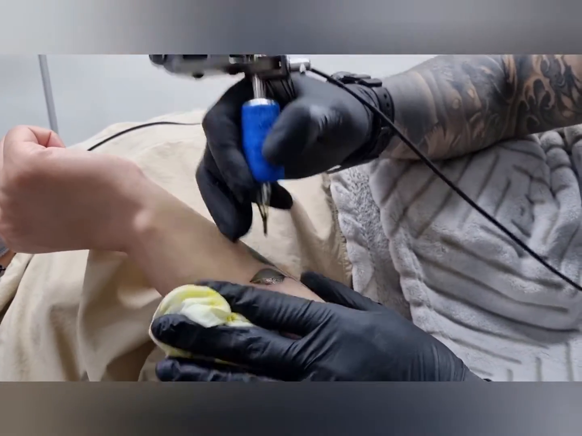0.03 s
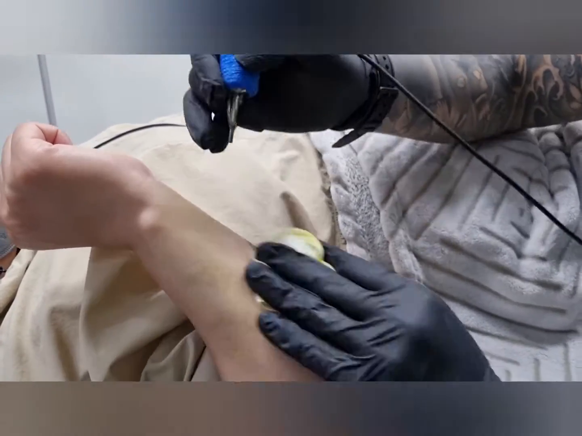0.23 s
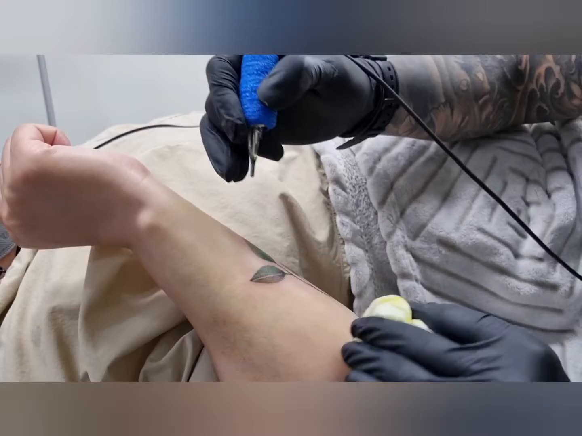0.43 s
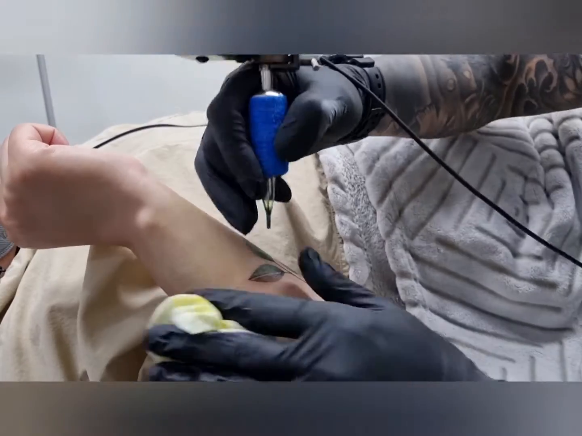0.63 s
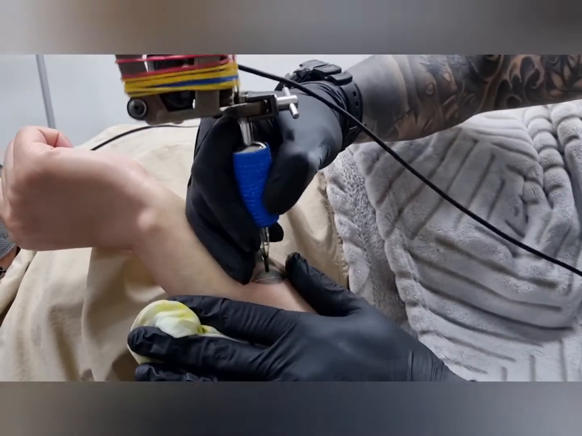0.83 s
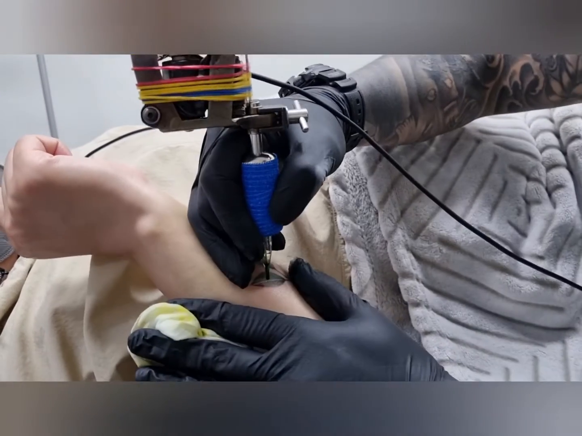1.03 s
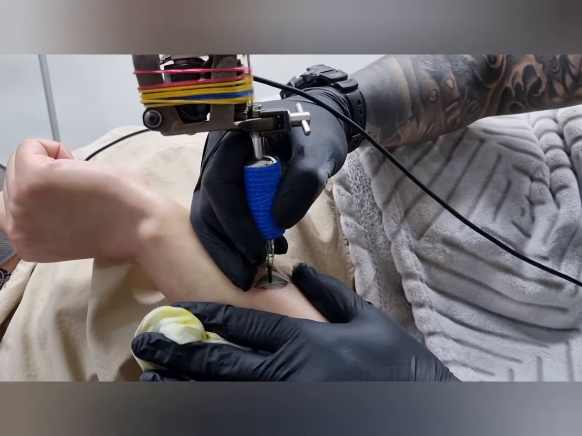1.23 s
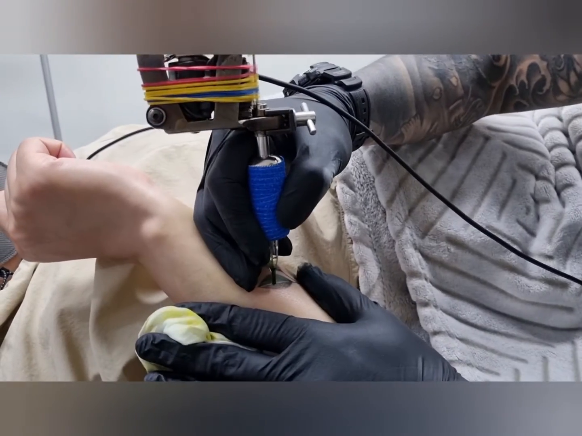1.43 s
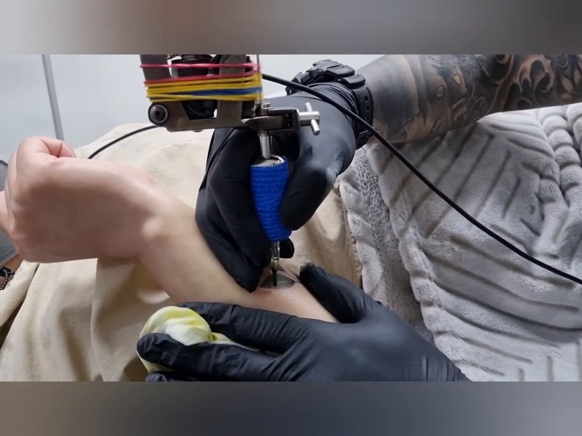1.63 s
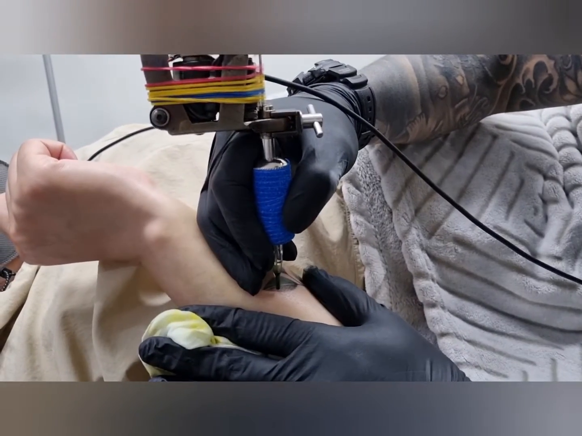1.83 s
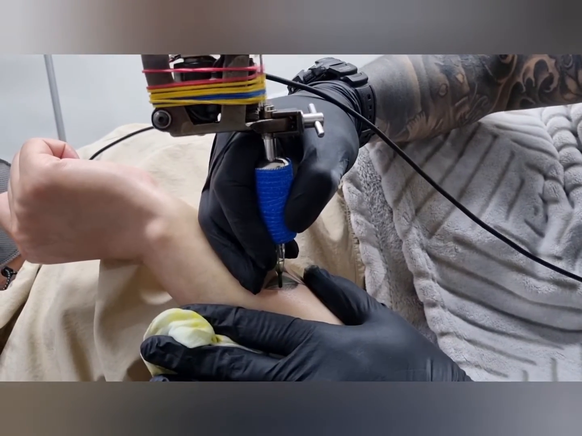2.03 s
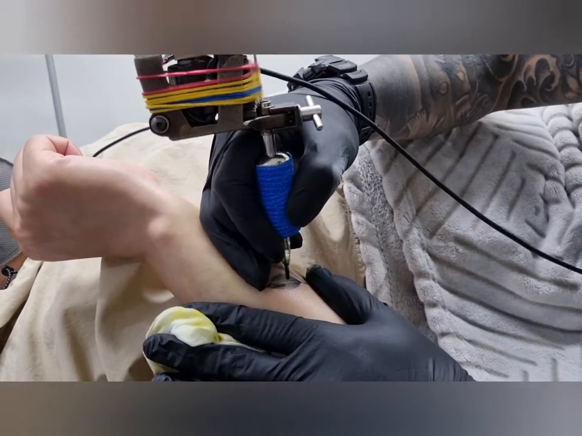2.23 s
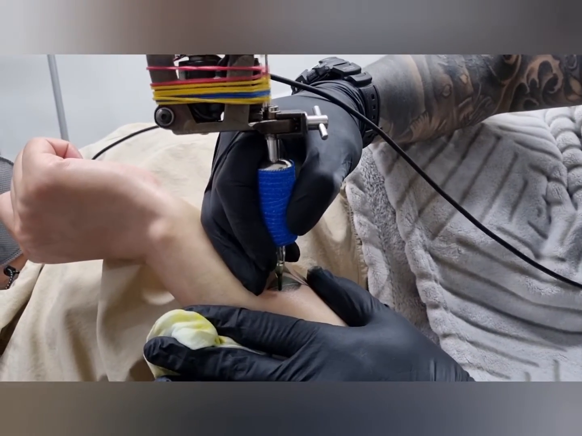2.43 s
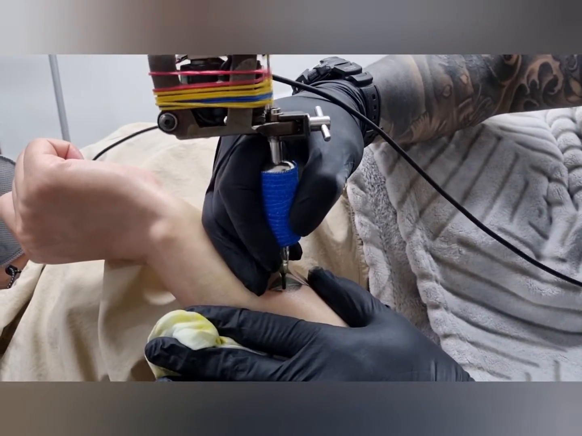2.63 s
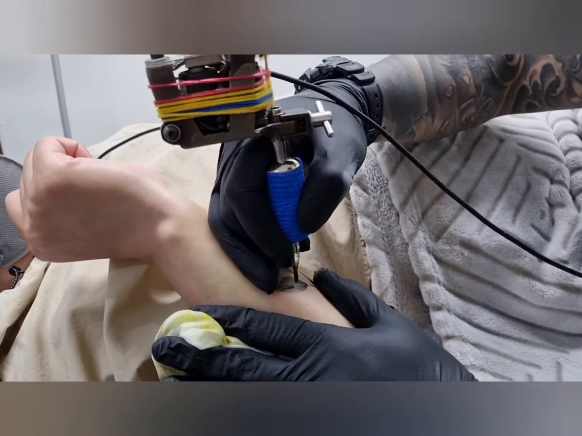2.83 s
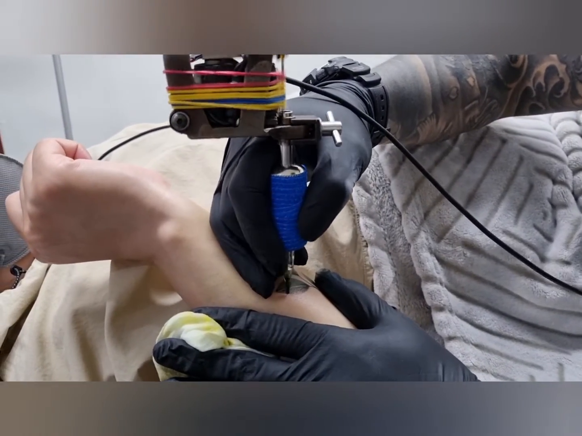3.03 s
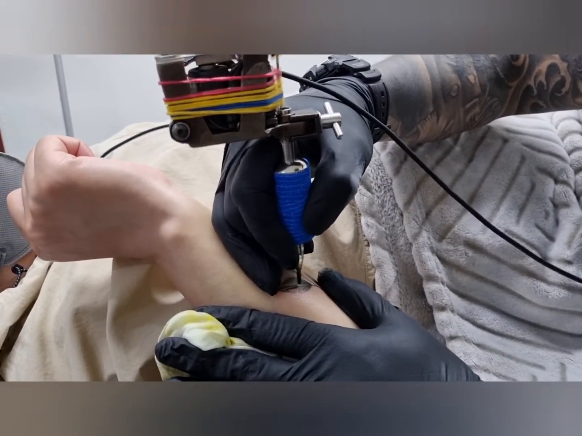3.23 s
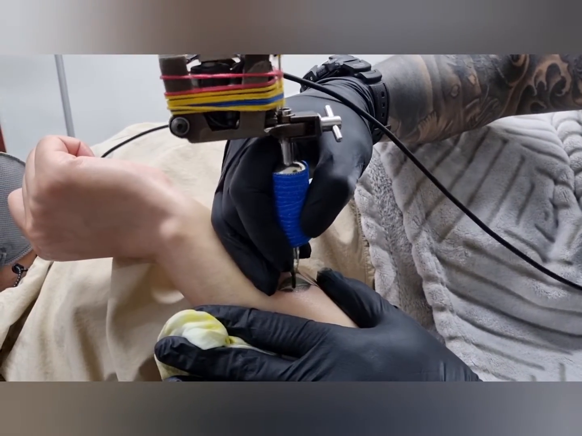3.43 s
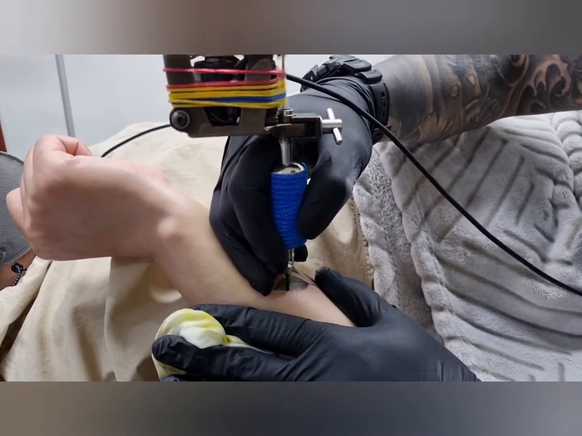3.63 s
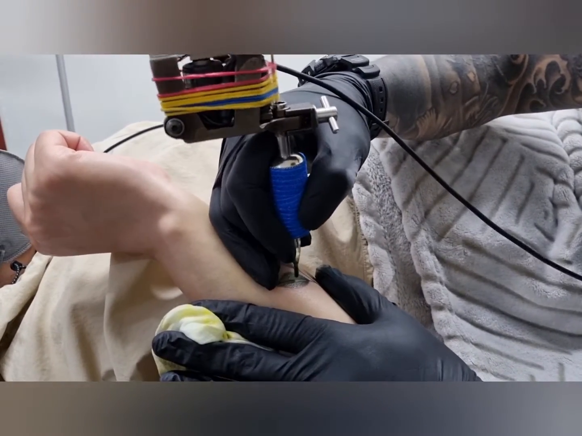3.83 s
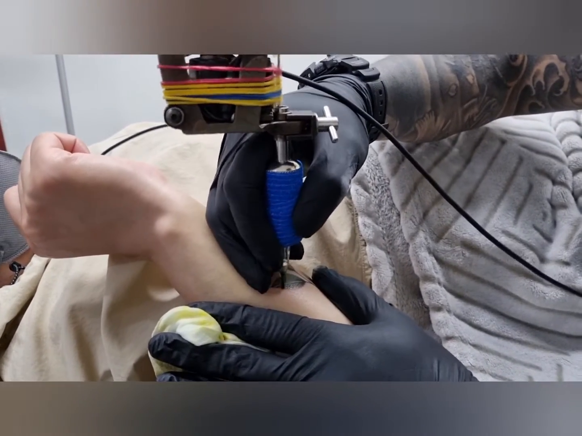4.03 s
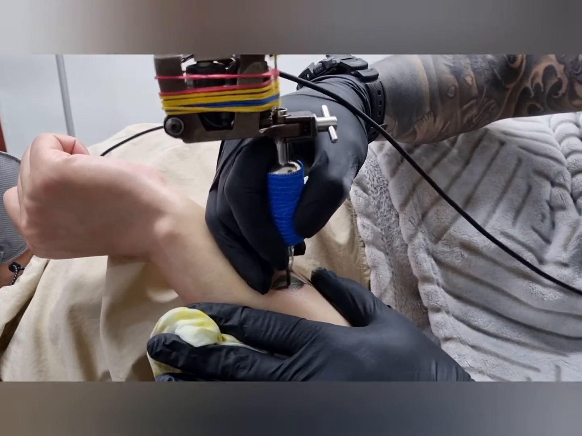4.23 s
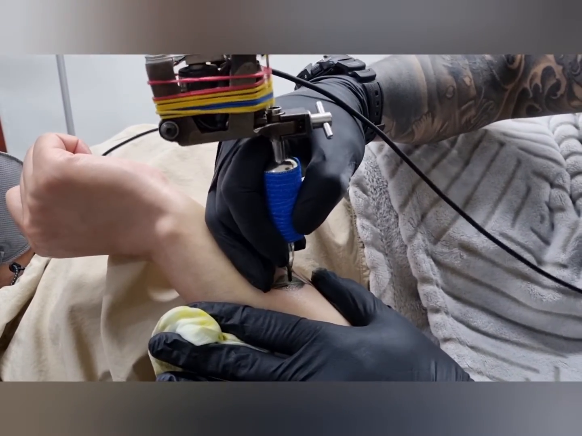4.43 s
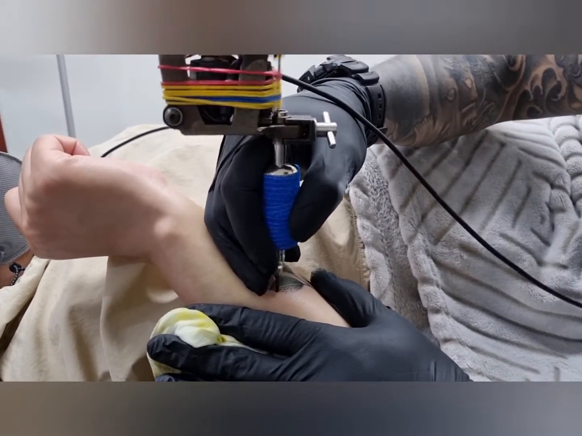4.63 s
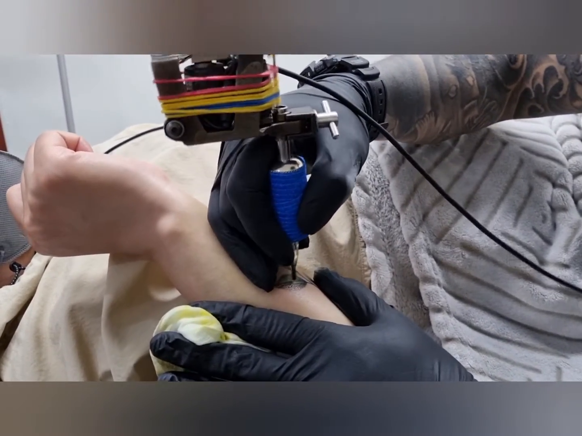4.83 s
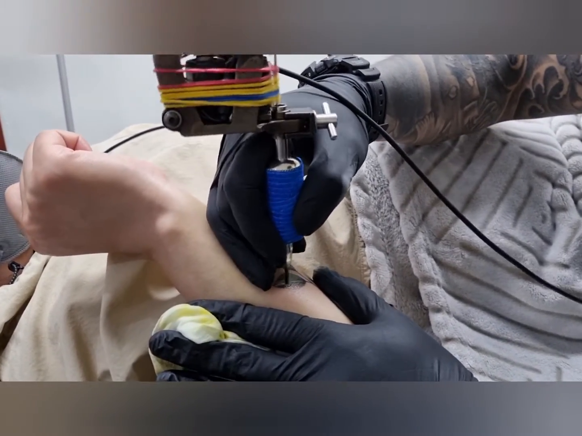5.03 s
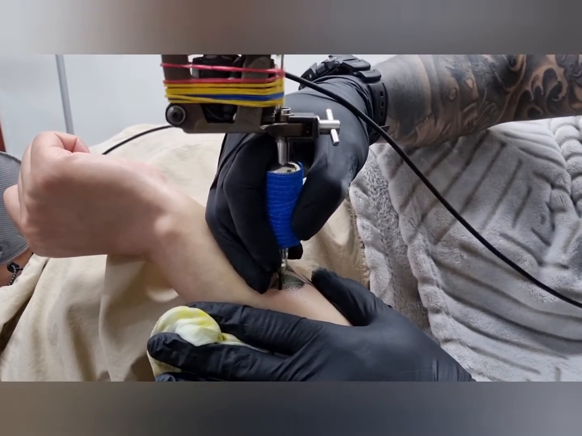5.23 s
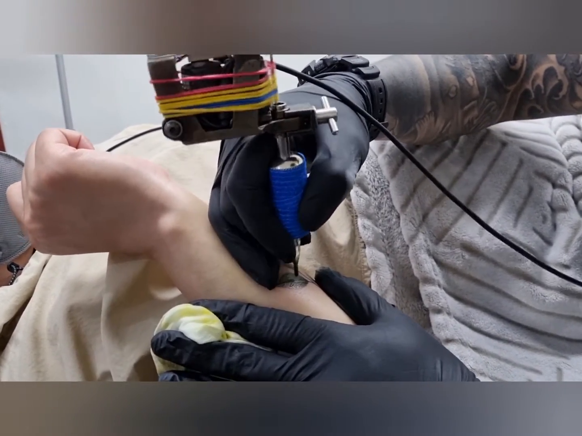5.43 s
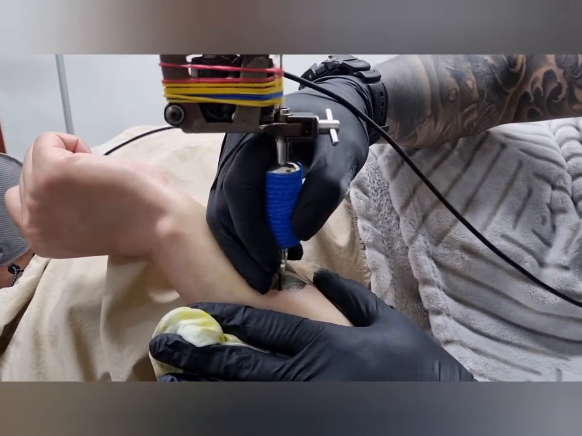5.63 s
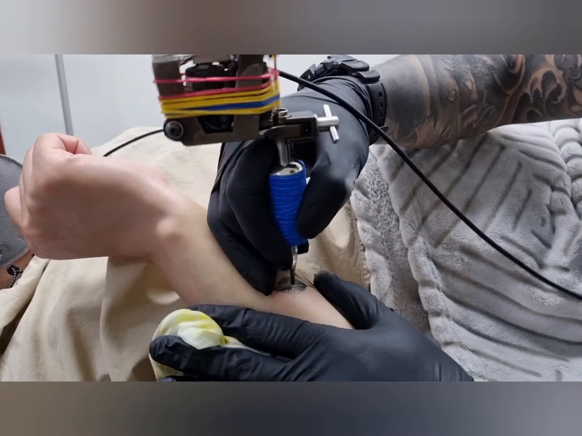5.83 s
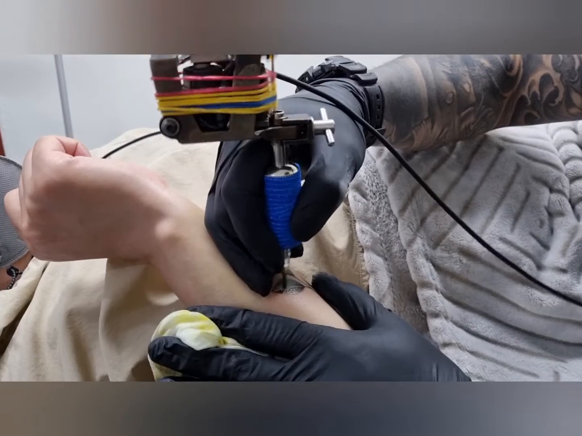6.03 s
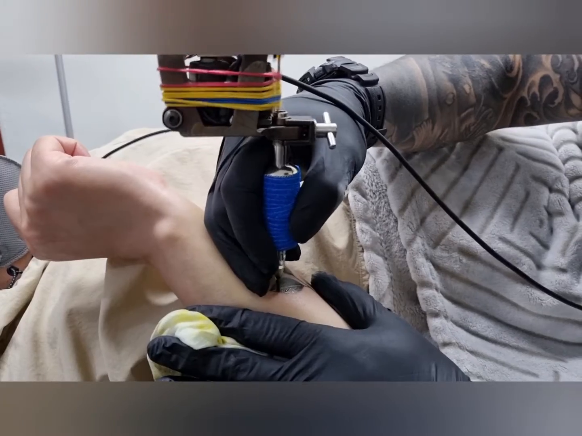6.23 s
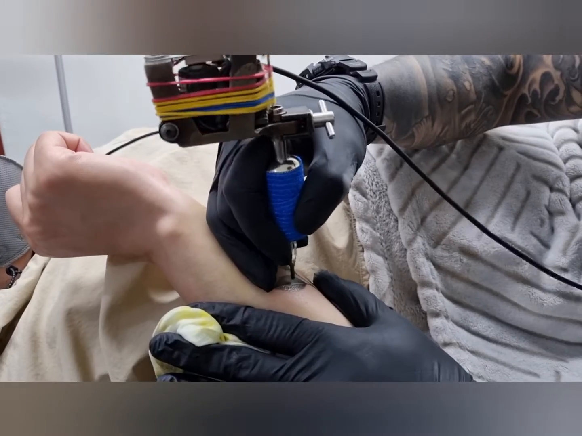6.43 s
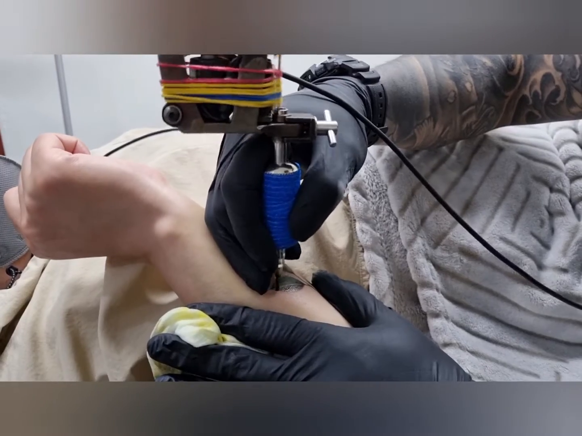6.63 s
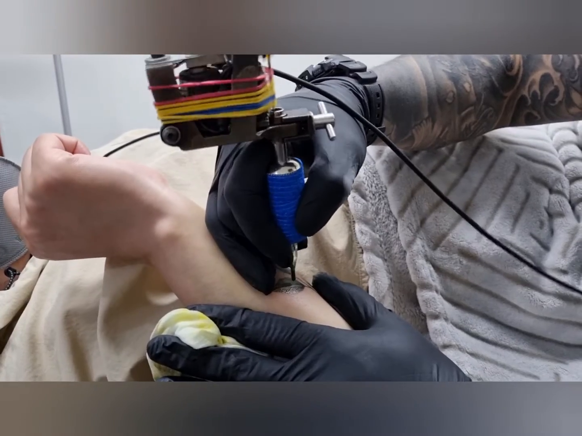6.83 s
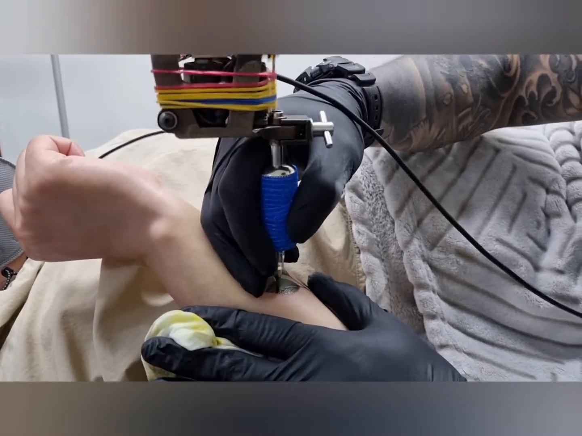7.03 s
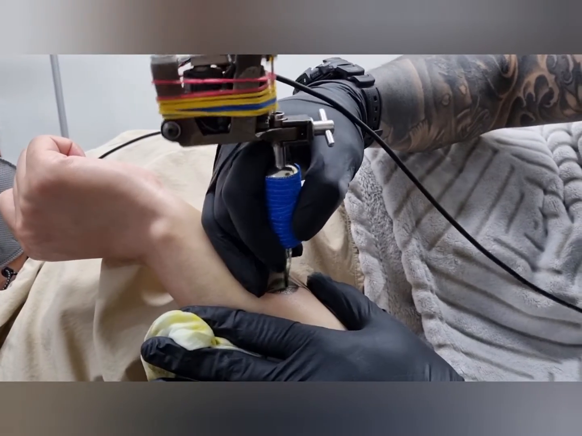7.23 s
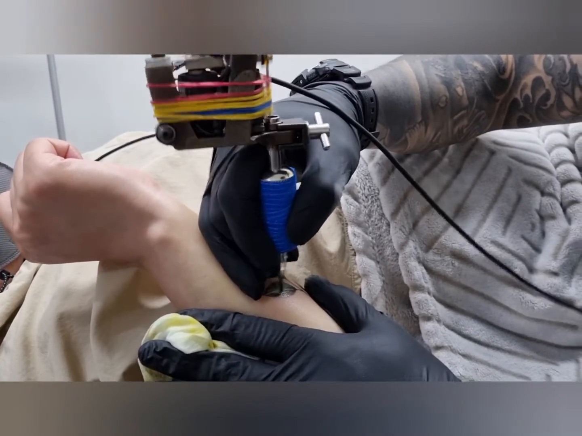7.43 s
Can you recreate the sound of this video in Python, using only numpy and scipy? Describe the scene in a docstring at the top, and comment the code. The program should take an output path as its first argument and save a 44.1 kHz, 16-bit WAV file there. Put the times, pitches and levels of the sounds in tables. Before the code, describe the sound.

In a small studio with a short, close room response, a coil tattoo machine buzzes right by a handheld camera. The first burst lasts under 0.1 s, then power drops with a very short ring. Until about 0.59 s there is near quiet: faint room air, soft grainy strokes of glove and tissue on skin, and light metallic ticks. A click and dull kick restart the machine, briefly looser and more rattly before the needle meets skin at about 0.76 s. It then holds a steady, harsh buzz of roughly 130 strokes a second, low hum beneath a bright, sizzling steel edge. From 2 s the timbre sways about twice a second, more deeply by 4.6 s. From 3.2 s fingers rub and crackle on the camera, with irregular low thumps, strongest around 6.3 to 7.2 s. The buzz continues to the end, about 7.5 s.

```python
"""In a small studio, a coil tattoo machine buzzes close to a handheld camera: about 130 strokes a second.
It stops for half a second while the skin is wiped, then runs on and the needle meets the skin.
From two seconds on its tone swings as the hand shades in growing circles; after three, handling bumps.
Stroke impulses with scattered phase excite steel resonances; a bank of cosines makes the hum.
Shaped noise makes air and wipes; filtered impulses make knocks and bumps. Levels precede later gains."""
import sys
import numpy as np
from scipy import signal
from scipy.fft import rfft, irfft, next_fast_len
from scipy.io import wavfile
from scipy.ndimage import map_coordinates

SR = 44100
rng = np.random.default_rng(int(sys.argv[2]) if len(sys.argv) > 2 else 0)


def materialize(psi):
    """Save the field psi as 16-bit PCM at rate SR to the path in sys.argv[1].

    A 1-D psi becomes a single channel; in a 2-D psi each row is a channel.
    """
    bounded = np.clip(np.atleast_2d(psi).T, -1, 1)
    quanta = np.round(bounded * 32767).astype(np.int16)
    wavfile.write(sys.argv[1], SR, quanta)


N = 330750
# splits a left-minus-right difference evenly over the two ports
HALVES = np.array([[.5], [-.5]])


def amp(db):
    """Decibels to gain."""
    return 10 ** (np.asarray(db) / 20)


def unit(x):
    """Scale to rms 1."""
    return x / np.sqrt(np.mean(x ** 2) + 1e-20)


def seconds():
    """Time of every sample."""
    return np.arange(N) / SR


def along(points, hz):
    """Interpolate (Hz, value) points on a log frequency axis."""
    f, v = np.transpose(points)
    return np.interp(np.log(hz + 1), np.log(f + 1), v)


def curves(rows):
    """One value per sample for each column after the time."""
    s, *cols = np.transpose(rows)
    return [np.interp(seconds(), s, c) for c in cols]


def wobble(rate):
    """Smooth random curve with rate knots a second."""
    knots = rng.standard_normal(int(N * rate / SR) + 4)
    return map_coordinates(knots, [np.arange(N) * rate / SR])


def filtered(x, response):
    """Multiply the spectrum of x by a complex response of frequency."""
    m = 2 * next_fast_len((N + SR) // 2)
    return irfft(rfft(x, m) * response(np.fft.rfftfreq(m, 1 / SR)), m)[..., :N]


def causal(points, hz):
    """Minimum-phase response with the given (Hz, dB) colour."""
    cepstrum = irfft(np.log(amp(along(points, hz))))
    cepstrum[1:len(hz) - 1] *= 2
    cepstrum[len(hz):] = 0
    return np.exp(rfft(cepstrum))


def mode(hz, centre_hz, width_hz):
    """Response of one damped resonance, 1 at its centre."""
    damping = 1j * hz * width_hz
    return damping / (centre_hz ** 2 - hz * hz + damping)


def pulses(times, sizes):
    """Impulses placed between samples by a windowed sinc."""
    at = np.asarray(times)[:, None] * SR
    index = np.floor(at).astype(int) + np.arange(-7, 9)
    taps = np.asarray(sizes)[:, None] * np.sinc(index - at) * np.sinc((index - at) / 8)
    inside = (index >= 0) & (index < N)
    return np.bincount(index[inside], taps[inside], N)


def dispersed(x, spread_s, step_hz):
    """Each frequency leaves the steel at its own moment, differently towards each ear."""
    def response(hz):
        knots = rng.standard_normal((2, 200))
        delay_s = spread_s * np.array([np.interp(hz / step_hz, np.arange(len(k)), k) for k in knots])
        return np.exp(-2j * np.pi * np.cumsum(delay_s, axis=1) * hz[1])
    return filtered(x, response)


def moving_resonance(x, centre_hz, width_hz):
    """Steep-sided resonance whose centre and width follow curves."""
    hz, t, z = signal.stft(x, SR, nperseg=256)
    centre, width = (np.interp(t * SR, np.arange(N), curve) for curve in (centre_hz, width_hz))
    detuning = (2 * (hz[:, None] - centre) / width) ** 2
    shaped = z / np.sqrt(1 + detuning ** 2 + detuning ** 3)
    return signal.istft(shaped, SR, nperseg=256)[1][:, :N]


def at_ports(x, lead):
    """One ring heard at both microphone ports, the left leading by a phase in radians."""
    return np.real(signal.hilbert(x) * np.exp(1j * lead * HALVES))


# Air noise colour. Each row: frequency in Hz, gain in dB.
AIR_COLOUR = [(25, -24), (90, -10), (170, -2), (260, -17), (400, -6), (700, -17), (2000, -23), (4000, -20),
              (8000, -30), (15000, -64.5)]
# Low rumble of the room. Each row: time in seconds, relative level in dB.
RUMBLE_LEVEL = [(0, -71.5), (0.7, -78), (1.3, -64.5), (2.3, -69.5)]


def background():
    """Room air and a low, slowly changing rumble as coloured noise, with a faint 120 Hz mains hum."""
    def noise(colour):
        return unit(filtered(rng.standard_normal((2, N)), lambda hz: amp(along(colour, hz))))
    rumble = noise([(30, -23.0), (80, -10.5), (120, -4.5), (150, -10.5), (200, 0), (340, -7.0),
                    (700, -18.0), (2000, -29)])
    rumble = rumble * amp(curves(RUMBLE_LEVEL)[0] + 1.5)
    mains = amp(-76) * np.sin(2 * np.pi * 120 * seconds())
    return amp(-74.5) * noise(AIR_COLOUR) + mains + rumble * amp([[2], [-2]])


# Glove and tissue on skin. Each row: peak time in seconds, length in seconds, centre in Hz,
# width in Hz, relative level in dB.
WIPE_STROKES = [(0.025, 0.069, 1220, 200, -61), (0.35, 0.041, 3450, 3000, -73),
                (0.389, 0.026, 1370, 500, -64.5), (0.46, 0.021, 1220, 300, -68),
                (0.508, 0.065, 2000, 700, -72)]
WIPE_GRAIN_DB, WIPE_RISE_PER_FALL = 3, 0.65


def wipes():
    """Glove and tissue catch and slip: each stroke a grainy swell of noise in one broad resonance."""
    t = seconds()
    out = np.zeros((2, N))
    for s, length, centre, width, db in WIPE_STROKES:
        noise = unit(filtered(rng.standard_normal((2, N)),
                              lambda hz: 1 / (1 + ((hz - centre) / width * 2) ** 2)))
        grain = unit(amp(WIPE_GRAIN_DB * wobble(220)))
        rise = np.where(t < s, WIPE_RISE_PER_FALL, 1)
        swell = np.exp(-(2 * (t - s) / length / rise) ** 2)
        out += amp(db + 3.5) * noise * grain * swell
    return out


# Fingers shift on the camera. Each row: start in seconds, length in seconds, relative level in dB.
FINGER_SHIFTS = [(3.182, 0.056, -56.5), (3.247, 0.15, -57.5), (3.487, 0.03, -50), (3.56, 0.032, -53.5),
                 (3.643, 0.032, -54), (3.794, 0.064, -63), (3.893, 0.03, -58), (3.942, 0.042, -57),
                 (4.136, 0.042, -54.5), (4.195, 0.026, -54), (4.286, 0.036, -55), (4.456, 0.081, -52),
                 (4.587, 0.041, -57), (4.638, 0.026, -50), (4.73, 0.072, -51), (4.862, 0.049, -55.5),
                 (5.016, 0.032, -50.5), (5.286, 0.022, -53), (5.323, 0.064, -53), (5.396, 0.04, -61),
                 (5.504, 0.017, -53.5), (5.705, 0.18, -53), (6.026, 0.11, -61.5), (6.241, 0.072, -50),
                 (6.344, 0.13, -48), (6.519, 0.059, -45.5), (6.622, 0.063, -59.5), (6.723, 0.11, -46),
                 (6.858, 0.051, -56), (6.934, 0.036, -52.5), (6.988, 0.12, -55), (7.183, 0.16, -49.5),
                 (7.416, 0.07, -46.5)]
HOLD_S, HOLD_DB = 3.18, -64  # fingers take hold; level of the resting hand
SHIFT_ATTACK_S, SHIFT_RELEASE_S, SHIFT_DB, SHIFT_SAG_DB = 0.01, 0.0081, -0.2, 4


def grip():
    """Handling strength: a restless hand, plus a swell per finger shift that sags and then dies away."""
    t = seconds()
    level = amp(HOLD_DB + 3.7 * wobble(15)) * (t > HOLD_S)
    for (s, length, db), chance in zip(FINGER_SHIFTS, rng.standard_normal(len(FINGER_SHIFTS))):
        sag_db = SHIFT_SAG_DB * (.5 - np.clip((t - s) / length, 0, 1))
        release_s = SHIFT_RELEASE_S * amp(3 * chance)
        attack = np.clip((t - s) / SHIFT_ATTACK_S, 0, 1)
        decay = np.exp(-np.maximum(t - s - length, 0) / release_s)
        level = level + amp(db + SHIFT_DB + sag_db) * attack * decay
    return level


# Bumps on the camera. Each row: time in seconds, relative peak level in dB.
CAMERA_BUMPS = [(3.273, -42), (3.359, -44.5), (3.491, -43.5), (3.654, -49), (3.801, -50.5), (3.83, -51),
                (3.854, -55), (3.9, -49), (4.303, -44), (4.642, -42), (4.736, -55), (5.028, -49),
                (5.294, -49), (5.361, -53), (5.73, -46), (5.807, -47), (5.83, -43), (6.262, -39.5),
                (6.293, -36.5), (6.532, -52), (6.555, -43), (6.74, -60), (6.778, -48), (6.8, -40.5),
                (7.009, -39.5), (7.225, -39.5)]
# Colour of bumps and rub. Each row: frequency in Hz, gain in dB.
BUMP_COLOUR = [(15, -24), (35, -7), (65, 4.5), (130, -8.5), (300, -11), (700, -18), (1500, -27),
               (4000, -40.5)]
# Colour of strokes carried into the camera body. Each row: frequency in Hz, gain in dB.
CARRIED_COLOUR = [(40, -18), (130, -1), (300, -0.5), (700, -5.5), (1500, -14), (4000, -19)]
# carried buzz at the firm grip level; a firmer grip carries more
CARRIED_DB, FIRM_GRIP_DB, CARRIED_DB_PER_GRIP_DB = -5.5, -45.5, 0.26
REBOUND_S, REBOUND_DB = 0.0077, -12  # second touch of a bumping finger


def handling(times):
    """Fingers slip in small jolts and let in the strokes as a crackle; the ports move in opposite senses."""
    level = grip()

    def body(x):
        return filtered(x, lambda hz: causal(BUMP_COLOUR, hz))

    def sway_gain(hz):
        return amp(along([(15, -5.5), (35, -4.5), (70, 0.0), (140, -28.5), (500, -20), (2000, -45)], hz))

    def far_response(hz):
        colour = causal([(30, -29.5), (70, -12.0), (150, -1.5), (300, 0.0), (1000, -0.5)], hz)
        return -colour * np.exp(2j * np.pi * hz * 0.00012)  # inverted, 0.12 ms early

    slips = rng.random((700, 2))
    rub = unit(body(pulses(slips[:, 0] * N / SR, slips[:, 1] - .5)))
    sway = unit(filtered(rng.standard_normal((2, N)), sway_gain))
    crackle = pulses(times, amp(2.7 * rng.standard_normal(len(times))))
    buzz = unit(filtered(crackle, lambda hz: causal(CARRIED_COLOUR, hz)))
    buzz = buzz * amp(CARRIED_DB) * (level / amp(FIRM_GRIP_DB)) ** CARRIED_DB_PER_GRIP_DB
    s, db = np.transpose(CAMERA_BUMPS)
    touches = pulses(s, amp(db)) + pulses(s + REBOUND_S, amp(db + REBOUND_DB))
    bumps = body(touches) / np.abs(body(pulses([1], [1]))).max()
    jolts = level * (amp(-5.5) * rub + buzz) + amp(7.0) * bumps
    far_port = filtered(jolts, far_response) * amp(0.5)
    return amp(7.0) * np.array([jolts, far_port]) + amp(-1.5) * level * sway


# Direct share of the blow. Each row: frequency in Hz, gain in dB.
DIRECT_SHARE = [(1000, -9.5), (3500, -44.5), (5500, -5.5), (8000, -5), (15000, -2.5)]
# Decay of the tail. Each row: frequency in Hz, T60 in seconds.
ROOM_T60 = [(200, 0.036), (2000, 0.19), (5500, 0.2), (9000, 0.18), (15000, 0.22)]


def studio(x, early_db, early_s, tail_db):
    """The direct blow, close reflections from arm and couch, then a short diffuse tail."""
    hz, t, z = signal.stft(rng.standard_normal((2, SR // 2)), SR, nperseg=256)
    tail = signal.istft(z * amp(-60 * t / along(ROOM_T60, hz)[:, None]), SR, nperseg=256)[1]
    early = rng.standard_normal(tail.shape) * np.exp(-np.arange(tail.shape[1]) / SR / early_s)
    answer = amp(tail_db) * tail / np.linalg.norm(tail[0])
    answer = answer + amp(early_db) * early / np.linalg.norm(early[0])
    direct = filtered(x, lambda hz: amp(along(DIRECT_SHARE, hz)))
    return direct + signal.fftconvolve(x, answer, axes=1)[:, :N]


# Small knocks of the machine in the hand. Each row: time in seconds, relative level in dB.
MACHINE_TICKS = [(0.153, -46.5), (0.456, -51), (0.573, -45), (0.583, -37)]
# Power on. Each row: first stroke in seconds, off in seconds.
POWER_RUNS = [(-0.3035, 0.069), (0.5883, 7.6)]


def ticks():
    """Light knocks of the idle machine as dispersed clicks, and the dull kick of its first stroke."""
    def click_colour(hz):
        return causal([(300, -17), (1300, 0), (4000, 7.5), (10000, 1), (13500, 10), (15800, -8)], hz)

    def kick_colour(hz):
        return causal([(40, -14), (200, -7.0), (2500, -11.0), (6000, -26)], hz)

    s, db = np.transpose(MACHINE_TICKS)
    clicks = filtered(pulses(s, amp(db + 5.0)), click_colour)
    kick = filtered(pulses([POWER_RUNS[1][0]], [amp(-9.5)]), kick_colour)
    clicks = dispersed(clicks, spread_s=0.00031, step_hz=840)
    return kick + studio(clicks, early_db=4, early_s=0.0042, tail_db=5.5)


TOUCH_S = 0.764  # the needle meets the skin


def lifted(settle_s):
    """1 while the needle runs free, 0 once it has settled in the skin."""
    return np.clip(1 - (seconds() - TOUCH_S) / settle_s, 0, 1)


PRESS_S, CIRCLES_PER_S = 5.9, 2.02  # nominal moment of full pressure; circling rate
WIDEN_FROM_S, WIDEN_UNTIL_S = 2.0, 4.6


def pressure():
    """Needle pressure, about -1 to 1, swinging once per circle of the hand; depth and timing wander."""
    t = seconds()
    depth = np.interp(t, (WIDEN_FROM_S, WIDEN_UNTIL_S), (0, 1)) * amp(1.7 * wobble(2))
    return depth * np.cos(2 * np.pi * CIRCLES_PER_S * (t - PRESS_S) + 0.3 * wobble(5))


# Armature speed. Each row: time in seconds, strokes per second.
STROKE_RATE = [(0.6, 129.67), (0.8, 129.23), (1.1, 129.35), (1.6, 129.5), (2.2, 129.22), (2.8, 129.93),
               (3.4, 129.24), (4.0, 129.37), (4.6, 129.45), (5.2, 129.6), (5.8, 129.71), (6.4, 129.93),
               (7.0, 129.66), (7.5, 129.89)]


def armature(wander_hz, jitter_s):
    """Integrate the stroke rate to swing phase in turns; each whole turn under power is a stroke."""
    t = seconds()
    rate = curves(STROKE_RATE)[0] + wander_hz * wobble(14)
    turns = np.cumsum(rate) / SR
    (first, stop), (restart, end) = POWER_RUNS
    # align the phase of each run to its first stroke
    turns -= np.where(t < (stop + restart) / 2, first * rate[0], np.interp(restart, t, turns))
    power = (t < stop) | ((t > restart - 1 / rate[0] / 2) & (t < end))
    at = np.flatnonzero((np.diff(np.floor(turns)) > 0) & power[1:]) + 1
    times = t[at] - turns[at] % 1 / rate[at]
    return times + jitter_s * rng.standard_normal(len(times)), turns, power


# Radiation of the frame's overtones. Each row: frequency in Hz, gain in dB.
OVERTONE_COLOUR = [(130, -12.5), (390, -14.5), (520, -15.5), (780, -25), (920, -13.5), (1160, -13.5),
                   (1300, -15.5), (1550, -6), (1690, -14), (1940, -6), (2150, 3), (2390, -14), (2590, 1.5),
                   (2750, -3.5), (3100, -4.5), (3370, -14), (3620, -6.5), (3900, -3), (4150, -5),
                   (4500, -10), (5200, -5.5), (6000, 2.5), (6500, -8.5)]
OVERTONE_COUNT, HUM_LEAD_RAD = 50, 2.28
HUM_DB, HUM_FREE_DB = -47.5, -6.5  # level in the skin; change when free
HUM_BUILD_S, HUM_RING_S = 0.16, 0.013  # build-up after touch; ring after power-off


def hum(turns, power, phase_spread, waver_db, sway, flutter):
    """The swinging mass shakes the frame at multiples of the stroke rate; the hand sways each overtone."""
    tone = np.zeros((2, N))
    stroke_hz = np.mean(STROKE_RATE, axis=0)[1]
    steps = np.arange(0, N, 100)

    def slow(rate):
        return map_coordinates(rng.standard_normal(int(N * rate / SR) + 4), [steps * rate / SR])

    def smooth(curve):
        return np.interp(np.arange(N), steps, curve)

    for multiple in range(1, OVERTONE_COUNT + 1):
        phase = phase_spread * rng.standard_normal((2, 1)) + HUM_LEAD_RAD * HALVES
        shake = smooth(sway * slow(2.515) + flutter * slow(45))
        gain_db = along(OVERTONE_COLOUR, multiple * stroke_hz) + waver_db * np.tanh(slow(12))
        tone += smooth(amp(gain_db)) * np.cos(2 * np.pi * multiple * turns + phase + shake)
    ringing = np.exp(-np.abs(seconds() - POWER_RUNS[0][1]) / HUM_RING_S)
    level = amp(HUM_DB + HUM_FREE_DB * lifted(HUM_BUILD_S))
    return level * unit(tone) * np.maximum(power, ringing)


# Chatter by frequency. Each row: frequency in Hz, share.
CHATTER_SHARE = [(1500, 0.97), (4000, 0.85), (7500, 1.07), (13000, 1.26)]


def impacts(times, lags, spread, ears, chatter, chatter_hz, scatter_db):
    """Flat-spectrum blows; phase scatter drifts slowly, differs by port and rattles between strokes."""
    size = 512
    hz = np.fft.rfftfreq(size, 1 / SR)

    def field(steps, step_hz):
        knots = rng.standard_normal((int(steps[-1]) + 4, 80))
        grid = np.meshgrid(steps, hz / step_hz, indexing="ij")
        return map_coordinates(knots, grid, order=2, mode="mirror")

    start = np.floor(times * SR).astype(int)
    late = 2 * np.pi * np.outer(times - start / SR, hz)
    chance = rng.standard_normal((len(times), 2))
    shared = spread * field(times * 1.17, step_hz=1506) - late
    looseness = chatter * amp(2.75 * chance[:, :1]) * along(CHATTER_SHARE, hz)
    out = []
    for port in range(2):
        phase = shared + ears * field(times * 0.813, step_hz=1436)
        phase = phase + looseness * field(np.arange(len(times)), chatter_hz)
        phase = phase + 2 * np.pi * (.5 - port) * np.outer(lags, hz)
        blows = np.fft.fftshift(irfft(np.exp(1j * phase)), axes=1) * amp(scatter_db * chance[:, 1:])
        index = start[:, None] + np.arange(size)
        out.append(np.bincount(index.ravel(), blows.ravel(), N + size)[size // 2:][:N])
    return np.array(out)


# Steel impact colour. Each row: frequency in Hz, gain in dB.
IMPACT_COLOUR = [(100, -25.5), (700, -22), (1700, -16), (2100, -10), (2400, -14.5), (2700, -3), (3100, -5),
                 (3370, -13), (3700, -0.5), (4400, -5.5), (5200, 0.5), (7200, 1.5), (8400, 4.5),
                 (9400, 5.5), (10100, 2), (10800, 3.5), (12700, 7), (14500, -5.5), (15800, -5)]
# Frame resonances. Each row: centre in Hz, width in Hz, gain in dB.
FRAME_MODES = [(2130, 200, -22), (2590, 70, -18), (3890, 50, -2.5), (5458, 42, 0), (5574, 42, 0),
               (8450, 200, -8.5), (10100, 300, -13)]
# Free needle bar rattling in its tube. Each row: centre in Hz, width in Hz, gain in dB.
RATTLE_MODES = [(3250, 220, -5), (4000, 350, -11), (4940, 550, 6.5), (7930, 630, 11), (10150, 590, -6)]
# Needle bar ringing in its tube. Each row: time in seconds, level in dB.
NEEDLE_LEVEL = [(1, -50), (2, -43), (5.7, -44), (7.5, -45)]
# Thin ring of the spring's tip. Each row: time in seconds, level in dB.
TIP_LEVEL = [(0.8, -43), (2.4, -47), (3.4, -40.5), (5, -38.5), (7.5, -38.5)]
# Contact spring as the grip slowly changes. Each row: time in seconds, centre in Hz,
# nominal width in Hz, level in dB.
SPRING_COURSE = [(0.6, 13400, 1300, -35.5), (1.0, 13230, 1700, -34), (2.0, 13300, 1590, -33.5),
                 (3.2, 13460, 1910, -41), (5.2, 12900, 2200, -40.5), (7.5, 13500, 2400, -47)]
SETTLE_S, RATTLE_DB = 0.068, -43.5
# levels in the skin; changes when free
IMPACT_DB, IMPACT_FREE_DB, FRAME_DB, FRAME_FREE_DB, FREE_CHATTER_DB = -33.5, -0.5, -44, -3.5, -1.5
# changes per unit pressure; FLAT lowers the spring's pitch
PRESS_SPRING_DB, PRESS_FLAT_HZ, PRESS_FRAME_DB, PRESS_CHATTER_DB = 1.2, 99, 0.2, 0.5
CIRCLE_LAG_S = 0.000009  # delay between ports per unit pressure
# widths are per stage of two; swings are per unit pressure; leads are of the left port
NEEDLE_HZ, NEEDLE_WIDTH_HZ, NEEDLE_SWING_RAD = 11850, 800, 0.6
TIP_HZ, TIP_WIDTH_HZ, TIP_LEAD_RAD, TIP_SWING_RAD = 13720, 850, 1.7, 1.15
FRAME_LEAD_RAD = -1.75


def steel(times):
    """Blows ring armature, frame, needle bar and spring; needle pressure shifts the spring's pitch."""
    free, press = lifted(SETTLE_S), pressure()
    spring_hz, spring_width_hz, spring_db = curves(SPRING_COURSE)
    impact_db = IMPACT_DB + IMPACT_FREE_DB * free + 0.37 * wobble(10)
    frame_db = FRAME_DB + FRAME_FREE_DB * free + PRESS_FRAME_DB * press + 0.63 * wobble(7.3)
    stroke_press, stroke_free = (np.interp(times * SR, np.arange(N), curve) for curve in (press, free))
    chatter = 0.99 * amp(PRESS_CHATTER_DB * stroke_press + FREE_CHATTER_DB * stroke_free)
    strokes = impacts(times, CIRCLE_LAG_S * stroke_press, spread=1.0, ears=1.21,
                      chatter=chatter[:, None], chatter_hz=703.0, scatter_db=1.04)
    # the reflections change as the hand travels
    travel = np.linspace(0, 2 * np.pi, N) + 0.45 * wobble(2.336)
    blows = sum(share * studio(strokes, early_db=-12.0, early_s=0.0084, tail_db=-4.5)
                for share in (np.cos(travel) ** 2, np.sin(travel) ** 2))

    def modes(rows):
        return lambda hz: sum(amp(db) * mode(hz, centre, width) for centre, width, db in rows)

    clack = unit(filtered(blows, lambda hz: causal(IMPACT_COLOUR, hz)))
    frame_drive = at_ports(strokes[0], FRAME_LEAD_RAD) + 0.57 * blows
    frame = unit(filtered(frame_drive, modes(FRAME_MODES)))
    needle_drive = at_ports(strokes[0], NEEDLE_SWING_RAD * press) + 0.4 * blows
    needle = unit(filtered(needle_drive, lambda hz: mode(hz, NEEDLE_HZ, NEEDLE_WIDTH_HZ) ** 2))
    tip_drive = at_ports(strokes[1], TIP_LEAD_RAD + TIP_SWING_RAD * press) + .2 * blows
    tip = unit(filtered(tip_drive, lambda hz: mode(hz, TIP_HZ, TIP_WIDTH_HZ) ** 2))
    rattle = unit(filtered(blows, modes(RATTLE_MODES)))
    spring = unit(moving_resonance(blows, spring_hz - PRESS_FLAT_HZ * press, spring_width_hz))
    springs = amp(spring_db) * spring + amp(curves(TIP_LEVEL)[0]) * tip
    return (amp(impact_db) * clack + amp(frame_db) * frame + amp(curves(NEEDLE_LEVEL)[0]) * needle
            + amp(RATTLE_DB) * free * rattle + amp(PRESS_SPRING_DB * press) * springs)


# Side the machine throws each band to. Each row: frequency in Hz, left minus right in dB.
BAND_LEAN = [(150, 11.5), (1000, 5.5), (2100, 6), (3000, -2.5), (4000, -4.5), (5500, -9.5), (6400, -3.5),
             (8300, 8.5), (9800, -1.5), (11500, 2), (13700, -1), (15000, 20.5)]
# Machine drifting across the stereo image. Each row: time in seconds, left minus right in dB.
SIDE_DRIFT = [(0.5, -0.5), (2.5, 0.25), (7, -1.6)]


def scene():
    """Sum all sources; the machine leans to one side by band and drifts across the image."""
    times, turns, power = armature(wander_hz=0.16, jitter_s=.00001)
    buzz = hum(turns, power, phase_spread=0.78, waver_db=7.0, sway=0.77, flutter=0.84)
    machine = steel(times) + buzz + ticks()
    placed = filtered(machine, lambda hz: amp(along(BAND_LEAN, hz) * HALVES))
    placed = placed * amp(curves(SIDE_DRIFT)[0] * HALVES)
    return placed + handling(times) + wipes() + background()


TOP_HZ = 15850


def record(dry):
    """The camera's band limit: a 150 Hz wide fade centred on TOP_HZ, nothing above."""
    return filtered(dry, lambda hz: np.clip((TOP_HZ - hz) / 150 + .5, 0, 1))


dry = scene()
out = record(dry)
materialize(out)
```